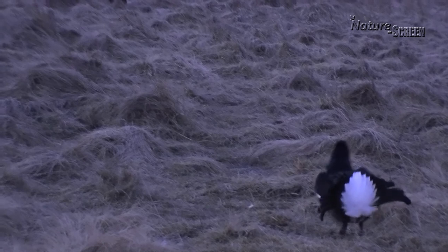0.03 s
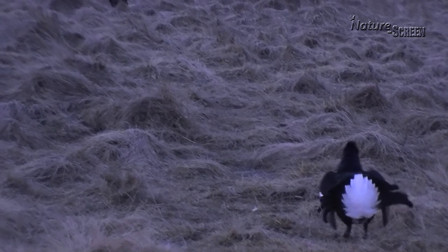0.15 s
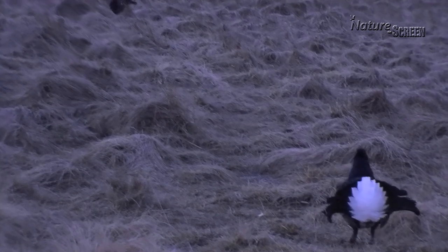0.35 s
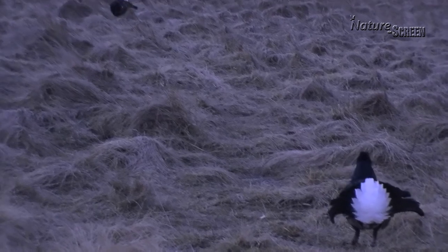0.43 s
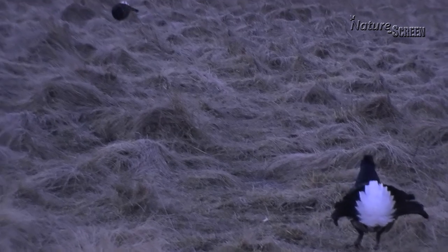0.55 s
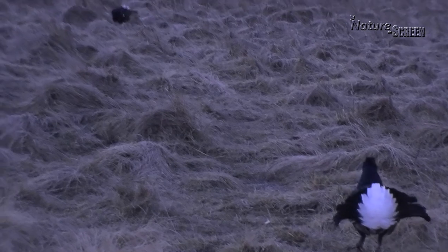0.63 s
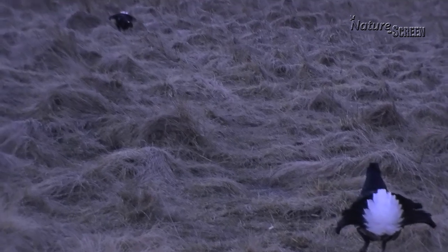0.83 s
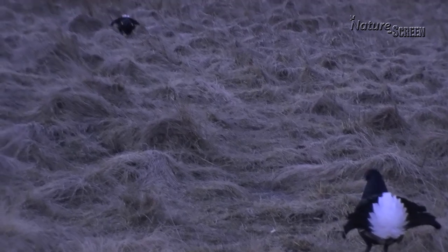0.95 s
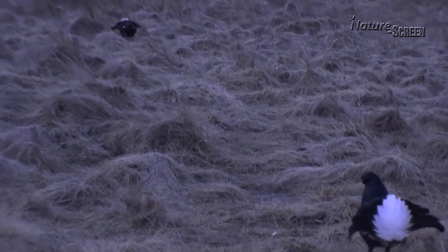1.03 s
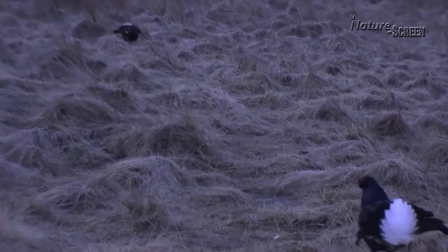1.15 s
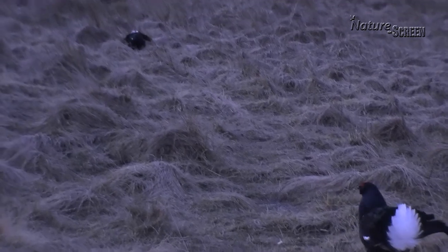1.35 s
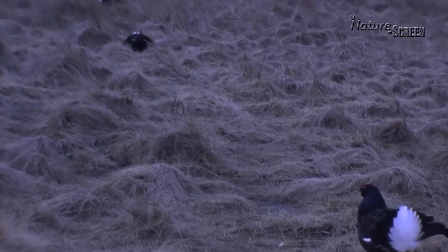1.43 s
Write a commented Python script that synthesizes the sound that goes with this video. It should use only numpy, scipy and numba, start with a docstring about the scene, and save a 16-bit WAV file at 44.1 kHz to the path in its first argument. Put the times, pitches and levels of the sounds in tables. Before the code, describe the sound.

On open grassland, a nearby black grouse lets out a harsh, airy burst that runs into a rasping hiss. The soft, low bubbling of a distant grouse continues after it, with faint chirps and one light tick.

```python
"""A black grouse hisses on open grassland: a sharp sneeze, a low catch, then a long rasping hiss,
all turbulent air through the moving resonances of its throat. Farther off another cock bubbles
in quick, mostly falling notes from an inflated throat. Small birds chirp faintly, something
ticks and rings, and a thin whine lies in the quiet air."""
import sys
import numpy as np
from scipy import signal
from scipy.fft import rfft, irfft
from scipy.io import wavfile
from scipy.ndimage import uniform_filter1d
from numba import njit

SR = 44100
rng = np.random.default_rng(int(sys.argv[2]) if len(sys.argv) > 2 else 0)


def int16_out(signal):
    """Quantize to a 16-bit WAV file."""
    q = np.round(np.clip(np.atleast_2d(signal).T, -1, 1) * 32767)
    wavfile.write(sys.argv[1], SR, q.astype(np.int16))


N = 66150
T = np.arange(N) / SR

# main throat resonance and call contour: t/s, level/dB, f/Hz, beak send/dB, low resonance re main/dB
CALL_CONTOUR = [(.192,-66.5,2260,-5,4), (.212,-35.5,2180,-10.5,-3), (.235,-21.5,2062,-13.5,-24),
                (.258,-18.5,2018,-13.5,-19), (.294,-25,1890,-13.5,-5), (.335,-44.5,1810,-11.5,18),
                (.39,-37,1700,-19.5,7), (.42,-48,1800,-6,8), (.48,-32.5,1840,-11.5,0.5),
                (.536,-27.5,1850,-11,-4.5), (.61,-33,2084,-8.5,-2), (.68,-35,2150,-6,-4),
                (.755,-37,2240,-5.5,-5.5), (.825,-45,2300,-10,11), (.854,-68,2080,9,3)]
# depth of the rasp, how unevenly the air bursts out: t/s, depth/dB
RASP_DEPTH = [(.2, 0.2), (.28, .5), (.36, 2.0), (.52, 0.7), (.7, 2.6), (.84, 3.5)]
# stereo placement of the call: f/Hz, left minus right/dB
CALL_PLACEMENT = [(1000, 0), (1450, 1.5), (2100, 1.3), (4000, -0.3)]


def hissing_grouse(throat_db=-0.5, beak_db=-4.5, rasp_hz=210, fade_s=0.022, low_cut_hz=1170):
    """Air forced in uneven bursts through the throat and out past the beak."""
    level_db, throat_hz, send_db, low_db = in_time(CALL_CONTOUR)
    depth_db, = in_time(RASP_DEPTH)
    body = from_db(throat_db) * throat(throat_hz, low_db)
    sizzle = from_db(beak_db + send_db) * beak()
    bursts = even_out(from_db(depth_db * np.clip(flutter(rasp_hz), -2, 2)), samples=1800)
    inside_s = np.minimum(T - CALL_CONTOUR[0][0], CALL_CONTOUR[-1][0] - T)
    gate = np.clip(1 + inside_s / fade_s, 0, 1)
    hiss = from_db(level_db) * bursts * (body + sizzle) * gate
    hiss = signal.sosfilt(signal.butter(10, low_cut_hz, "high", fs=SR, output="sos"), hiss)
    pan = from_db(at_bins(CALL_PLACEMENT) * [[.5], [-.5]])
    return field(irfft(rfft(hiss) * pan, N), wet_db=-19)


# sweep of the low throat resonance: t/s, f/Hz
LOW_SWEEP = [(.29, 1550), (.39, 1440), (.46, 1400), (.53, 1590), (.74, 1496), (.83, 1436)]


def throat(main_hz, low_db, top_ratio=1.314, upper_ratio=1.306, upper_db=-21.5):
    """Turbulence through three moving resonances; the main one saturates like a rough whistle."""
    low_hz, = in_time(LOW_SWEEP)
    main = even_out(cavity(main_hz, width_hz=387), samples=149)
    main = swept_lowpass(main, main_hz * top_ratio)
    low = even_out(cavity(low_hz, width_hz=395), samples=440)
    upper = cavity(main_hz * upper_ratio, width_hz=710)
    blend = main + from_db(upper_db) * upper + from_db(low_db) * low
    return blend / np.sqrt(1 + from_db(low_db) ** 2)


# colour of the hiss at the beak: f/Hz, relative level/dB
BEAK_COLOUR = [(1000, 0), (2600, 0), (3200, -7), (3550, 1), (4250, 2.5), (4700, 0), (5200, -2.5),
               (5750, -4), (6500, -9.5), (8200, -18), (11000, -25.5), (13000, -38), (15500, -55)]
# narrow rings over that hiss: f/Hz, width/Hz, relative level in the sneeze/dB, in the long hiss/dB
BEAK_RESONANCES = [(5154, 330, -5.5, -28), (4134, 540, -6.5, -23), (5630, 190, -16.5, -19),
                   (7930, 720, -25.5, -20.5)]


def beak(long_hiss_start_s=.44):
    """Bright air rushing past the beak and ringing in it, most strongly in the sneeze."""
    hiss = noise(BEAK_COLOUR)
    for hz, width_hz, sneeze_db, hiss_db in BEAK_RESONANCES:
        ring_db = np.where(T < long_hiss_start_s, sneeze_db, hiss_db)
        hiss += from_db(ring_db) * cavity(hz, width_hz)
    return hiss


def call_undertone(db=-60, follows=0.099):
    """A soft rush of air below the throat resonances, lasting as long as the call."""
    call_db = in_time(CALL_CONTOUR)[0]
    gate = np.clip((call_db - call_db[0]) / 20, 0, 1)
    rush = noise([(300, -11), (520, -5), (700, 14.5), (1000, 3), (1500, -22)])
    return gate * from_db(db + follows * call_db) * rush


# the far cock's bubbling phrase: peak t/s, f/Hz, level before trim/dB, glide/(Hz/s), length/s
BUBBLE_NOTES = [(0.028, 405, -46.5, -1900, 0.073), (0.022, 604, -55, 500, .04),
                (0.056, 510, -52, -5000, 0.041), (.096, 455, -48, 2991, 0.04), (.134, 450, -54.5, 495, .04),
                (.205, 470, -48, -7000, 0.032), (0.263, 340, -58, -1000, 0.033),
                (0.313, 382, -53, -2200, 0.051), (0.426, 410, -52.5, -4500, 0.043),
                (0.487, 340, -63.5, -2500, 0.076), (0.565, 335, -63.5, -1200, 0.0461),
                (0.621, 388, -55, -1300, .06), (0.69, 412, -49.5, -1700, 0.065),
                (0.755, 392, -55.5, -1800, 0.078), (0.828, 411, -49.5, -1700, 0.058),
                (0.902, 415, -48, -2200, 0.053), (0.971, 417, -48.5, -2200, 0.055),
                (1.042, 420, -48.5, -2200, 0.059), (1.113, 423, -47.5, -2300, 0.053),
                (1.183, 424, -49.5, -2500, 0.056), (1.256, 427, -47, -2400, 0.053),
                (1.333, 452, -48.5, -2800, 0.059), (1.41, 460, -47.5, -2900, 0.058),
                (1.479, 478, -50, -3000, 0.058)]


def bubbling_grouse(trim_db=-1.5, octave_db=-24, arch_hz=141.5):
    """Nearly pure low notes from an inflated throat, about fourteen a second."""
    phrase = np.zeros(N)
    for s, hz, db, glide, length in BUBBLE_NOTES:
        bend = -glide ** 2 / arch_hz   # steeper notes arch more
        envelope, phase = note(s, hz, db, glide, length, bend)
        phrase += envelope * (np.sin(phase) + from_db(octave_db) * np.sin(2 * phase))
    pan = from_db([[.6], [-.6]])
    return field(from_db(trim_db) * phrase * pan, wet_db=-19)


# distant chirps: peak t/s, f/Hz, level/dB, glide/(Hz/s), length/s
SONGBIRD_NOTES = [(0.038, 1217, -55.5, -4000, 0.035), (0.91, 3170, -68.5, 500, 0.077),
                  (0.944, 2880, -69.5, -9000, .04), (1.016, 2550, -63, -30000, 0.019),
                  (1.194, 2630, -70, 5991, 0.054), (1.273, 2670, -65.5, -25000, 0.017),
                  (1.444, 3290, -68, -5, 0.066), (1.454, 1974, -64.5, -1500, .08)]


def songbirds(waver_rad=0.51, waver_hz=150):
    """Faint wavering whistles from far across the field."""
    notes = [note(*row, bend=-110000) for row in SONGBIRD_NOTES]
    chirps = sum(envelope * np.sin(phase + waver_rad * flutter(waver_hz)) for envelope, phase in notes)
    return field(chirps, wet_db=-14)


# modes of a lightly struck object: f/Hz, level/dB, t60/s
TICK_RING = [(1010, -52.5, 0.89), (1066, -47.5, 0.027), (3210, -57, 0.032)]


def tick(start_s=1.384, crack_db=-51.5, crack_t60_s=0.033, low_cut_hz=600):
    """One light contact with a brief crack; its lowest mode rings on."""
    t = np.maximum(T - start_s, 0)
    ring = sum(from_db(db - 60 * t / t60) * np.sin(2 * np.pi * hz * t) for hz, db, t60 in TICK_RING)
    decay = (t > 0) * from_db(crack_db - 60 * t / crack_t60_s)
    crack = decay * noise([(2200, 2), (3300, 1), (6400, -13), (9000, -26)])
    return signal.sosfilt(signal.butter(2, low_cut_hz, "high", fs=SR, output="sos"), ring + crack)


# partials of the whine: f/Hz, rms level/dB
WHINE_PARTIALS = [(2186, -66), (2643, -90), (4371, -84), (5825, -81.5), (6557, -81.5), (8742, -89.5)]


def whine():
    """A thin, steady stack of high pure tones."""
    return sum(np.sqrt(2) * from_db(db) * np.sin(2 * np.pi * hz * T) for hz, db in WHINE_PARTIALS)


# colour of the air bed: f/Hz, relative level/dB
AIR_COLOUR = [(25, -34), (70, -21.5), (140, -9), (250, -9), (400, -2.5), (650, -2), (1100, 0.5), (1800, -7),
              (2800, -10), (4000, -14.5), (5000, -16.5), (6500, -17.5), (10000, -24), (14000, -30.5),
              (15600, -34)]
# stereo image of the air bed: f/Hz, left-right correlation
AIR_CORRELATION = [(30, 0.64), (120, -0.58), (400, -0.11), (700, -0.076), (2000, -0.19), (12000, -0.00026)]


def quiet_air(level_db=-56.5):
    """A wide, soft bed of open air, built from mid and side noise."""
    alike = np.clip(at_bins(AIR_CORRELATION), -.95, .95)
    mid = np.sqrt(1 + alike) * rfft(noise(AIR_COLOUR))
    side = np.sqrt(1 - alike) * rfft(noise(AIR_COLOUR))
    return from_db(level_db) * rms_one(irfft(mid + side * [[1], [-1]], N))


def field(x, wet_db, t60_s=0.12, predelay_s=.004):
    """Direct sound plus a faint dull scatter from the tussocks, different in each ear."""
    dull = signal.lfilter([1], [1, -.7], rng.standard_normal((2, N)))
    tail = dull * from_db(-60 * T / t60_s) * (T > predelay_s)
    tail /= np.sqrt(np.sum(tail ** 2, axis=1, keepdims=True))
    scatter = signal.fftconvolve(x * np.ones((2, 1)), tail, axes=1)[:, :N]
    return x + from_db(wet_db) * scatter


def note(s, hz, db, glide, length, bend):
    """Envelope and phase of one swelling note on an arched glide; bend is in Hz/s^2."""
    t = np.clip(T - s, -length / 2, length / 2)
    envelope = np.sqrt(2) * from_db(db) * np.abs(np.cos(np.pi * t / length)) ** 1.47
    pitch_hz = hz + glide * t + bend * t * t
    return envelope, 2 * np.pi * (np.cumsum(pitch_hz) / SR + rng.random())


def cavity(hz, width_hz):
    """Turbulence through two like resonators in series for steep sides, rms 1."""
    angle = 2 * np.pi * hz / SR * np.ones(N)
    radius = np.exp(-np.pi * width_hz / SR)
    once = resonate(rng.standard_normal(N), angle, radius)
    return rms_one(resonate(once, angle, radius))


@njit
def resonate(x, angle, radius):
    """Two-pole resonance with a moving centre."""
    y = np.zeros(len(x))
    for i in range(2, len(x)):
        drive = (1 - radius ** 2) / 2 * (x[i] - x[i - 2])
        y[i] = drive + 2 * radius * np.cos(angle[i]) * y[i - 1] - radius ** 2 * y[i - 2]
    return y


def swept_lowpass(x, edge_hz):
    """Steep low-pass with a moving edge: filtered on a clock that runs with the edge."""
    clock, ticks = np.cumsum(edge_hz / edge_hz.mean()), np.arange(N)
    steep = signal.butter(8, edge_hz.mean(), fs=SR, output="sos")
    warped = np.interp(ticks, clock, x)
    return np.interp(clock, ticks, signal.sosfilt(steep, warped))


def even_out(x, samples):
    """Ride the gain to hold the running rms near 1."""
    return x / np.sqrt(uniform_filter1d(x ** 2, samples))


def noise(colour):
    """Noise shaped by (f/Hz, level/dB) points, rms 1."""
    return rms_one(irfft(rfft(rng.standard_normal(N)) * from_db(at_bins(colour)), N))


def flutter(rate_hz):
    """Smooth random motion, rms 1."""
    smooth = signal.butter(2, rate_hz, fs=SR, output="sos")
    return rms_one(signal.sosfilt(smooth, rng.standard_normal(N)))


def in_time(rows):
    """Each column of an automation curve at every sample."""
    s, *columns = np.transpose(rows)
    return [np.interp(T, s, column) for column in columns]


def at_bins(points):
    """A curve over log frequency, read at every Fourier bin."""
    hz, value = np.transpose(points)
    bin_hz = np.arange(N // 2 + 1) * SR / N
    return np.interp(np.log(bin_hz + 1), np.log(hz), value)


def from_db(db):
    """Decibels to gain."""
    return 10 ** (np.asarray(db) / 20)


def rms_one(x):
    """Scale to rms 1."""
    return x / np.sqrt(np.mean(x ** 2) + 1e-20)


def scene():
    """The hissing bird in front, everything else around it."""
    call = hissing_grouse() + call_undertone()
    return call + bubbling_grouse() + songbirds() + tick() + whine() + quiet_air()


def record(dry, high_cut_hz=15650):
    """A steep high cut on the whole mix."""
    return signal.sosfilt(signal.ellip(12, .1, 80, high_cut_hz, fs=SR, output="sos"), dry)


dry = scene()
out = record(dry)
int16_out(out)
```